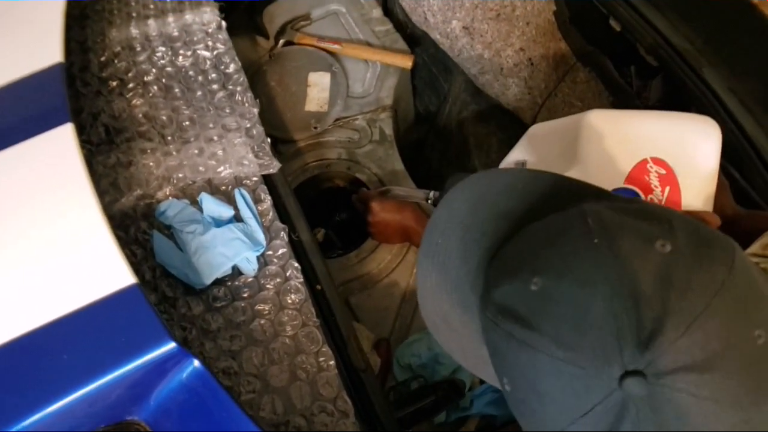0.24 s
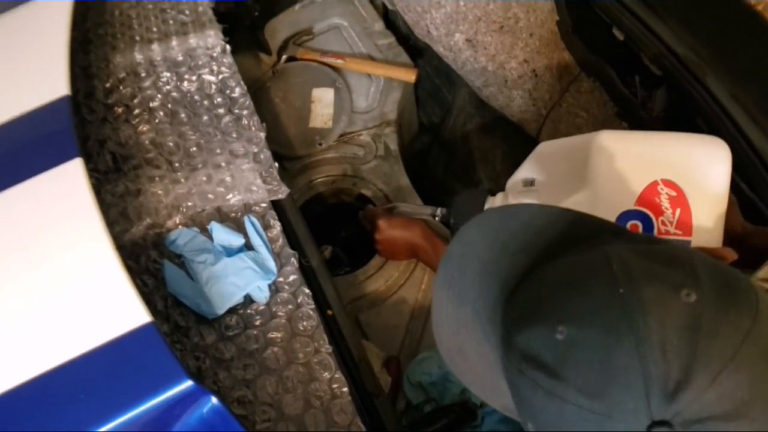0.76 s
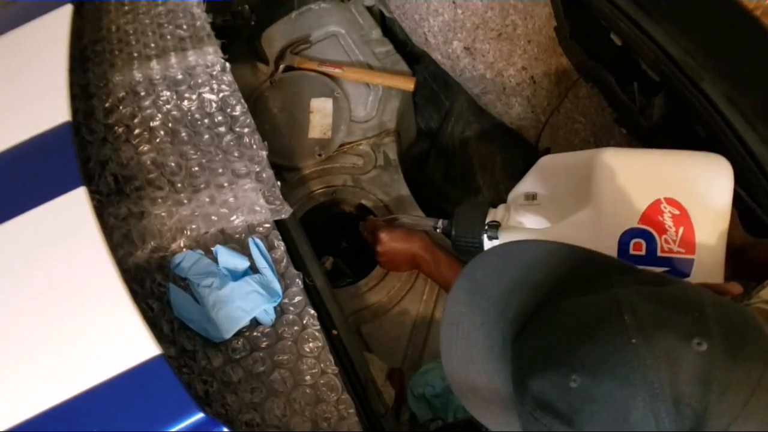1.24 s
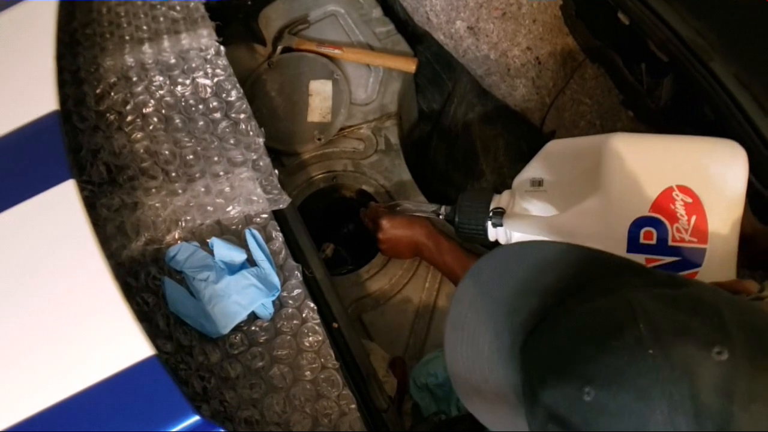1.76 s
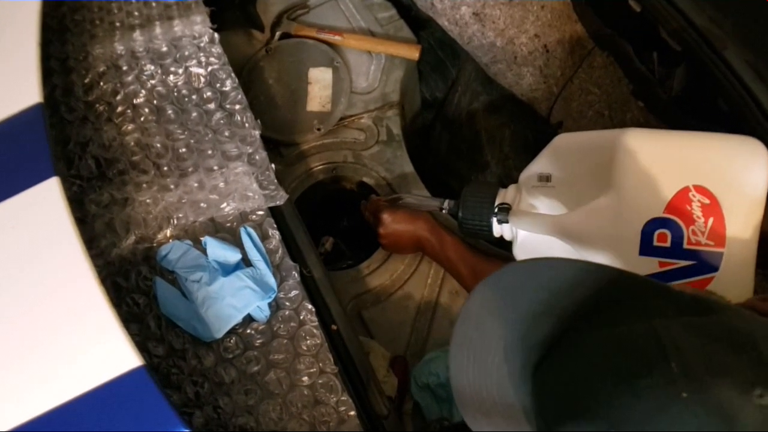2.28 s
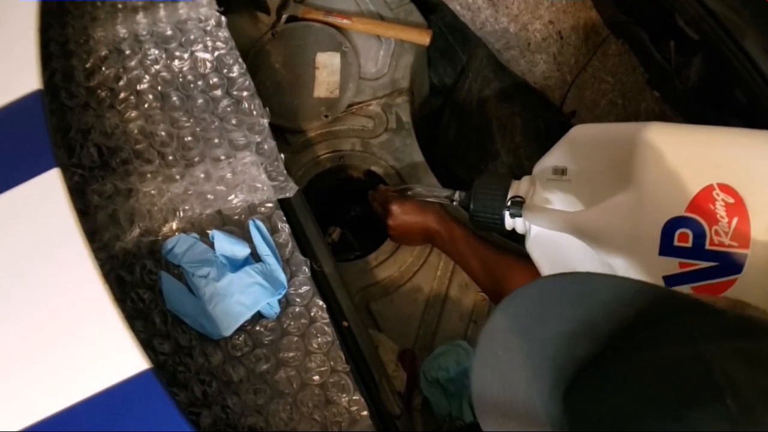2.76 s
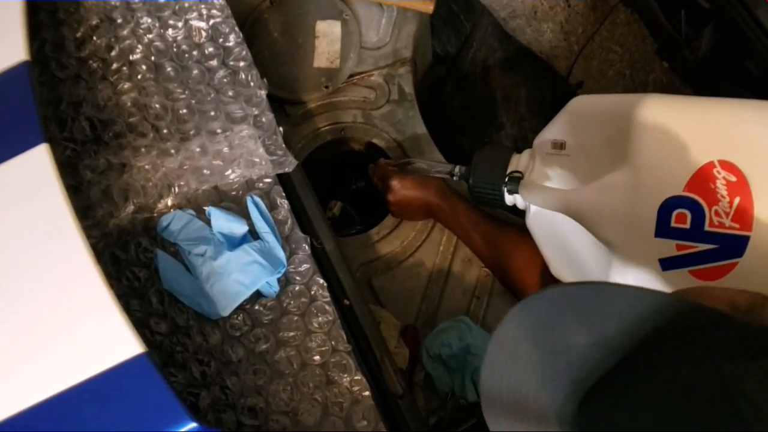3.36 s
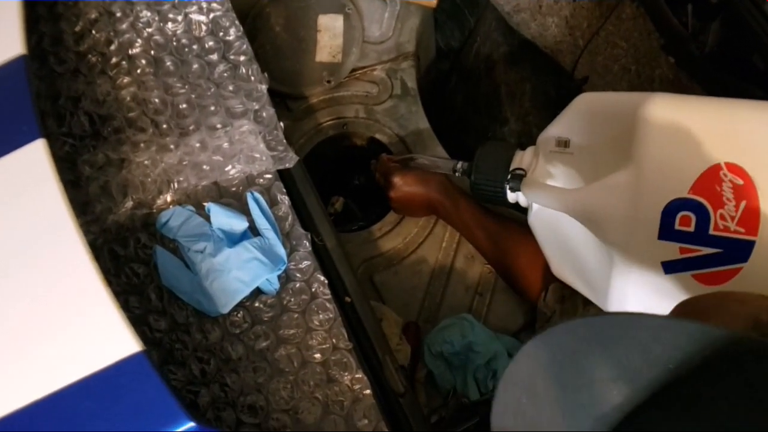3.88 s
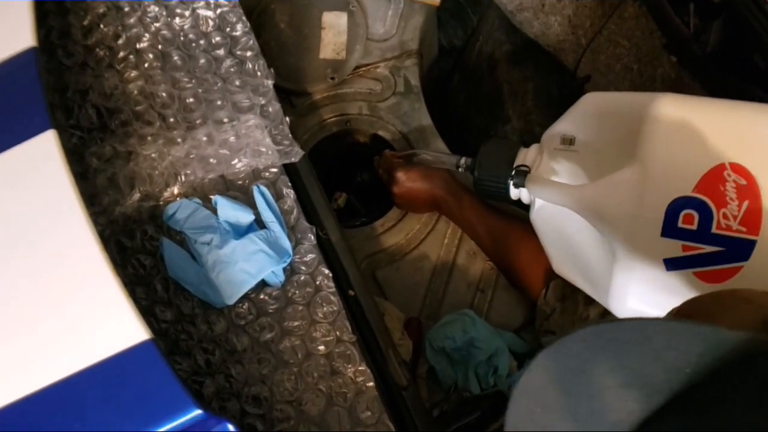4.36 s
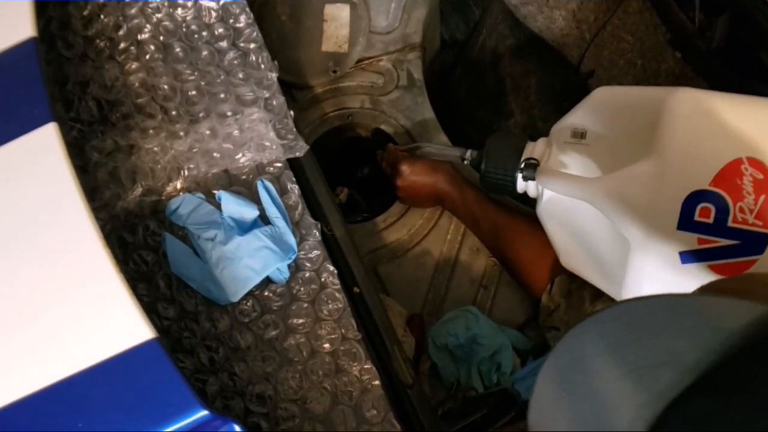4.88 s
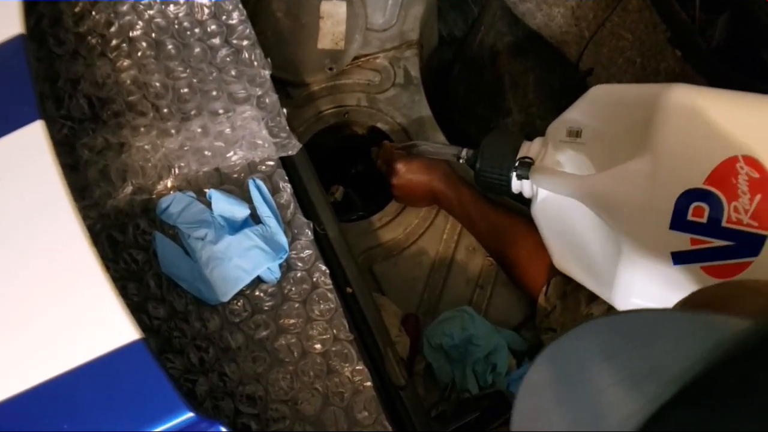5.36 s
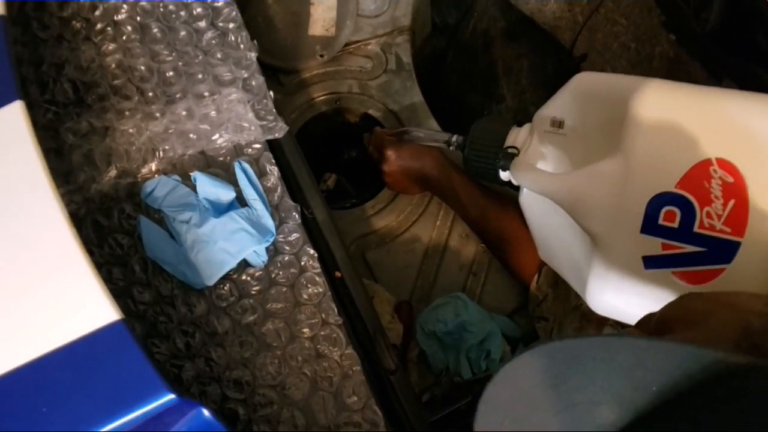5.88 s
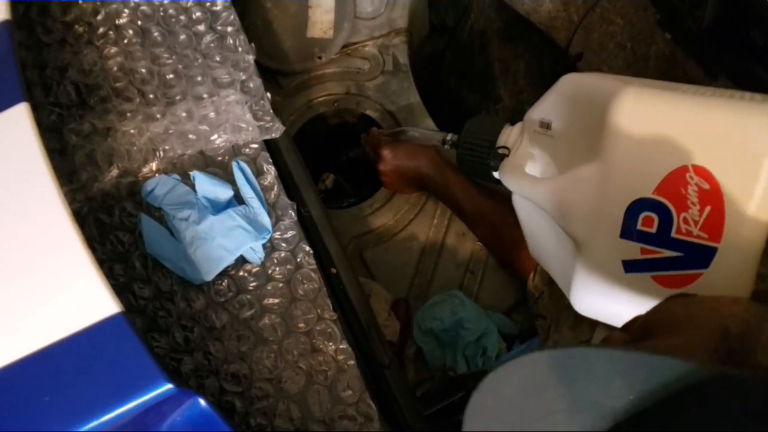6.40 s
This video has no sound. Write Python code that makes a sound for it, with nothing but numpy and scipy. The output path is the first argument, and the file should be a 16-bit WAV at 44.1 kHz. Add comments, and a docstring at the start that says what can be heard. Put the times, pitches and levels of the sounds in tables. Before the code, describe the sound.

Fuel runs continuously through a hose from a plastic jug into a hollow car tank, heard close and almost mono with slight garage reflections and a very faint steady noise. From 0 to 1 s a bright, fizzy spatter mixes with quick low plops, gurgling and soft jug rumble and bumps. At about 1.2 s the jug buckles with a deep, boomy thump, by far the loudest event, with a weaker one at 1.4 s. Small metallic hose knocks follow until 1.7 s. From 2 to 3.5 s the bubbling is calmer, the trickle dipping briefly near 1.9 and 2.8 s. Around 3.7 s the flow brightens with crisp splashes; a sharp slap comes at 4.6 s, then thicker gurgling and plops. Light hose knocks tick around 5.1 s, strong splashes snap at 5.9 s, and muffled jug thumps cluster from 6 s to the end at 6.6 s, still pouring.

```python
"""Fuel poured from a jug into a tank

Fuel runs through a hose into a car's hollow tank: filtered random clicks spatter and fizz, ringing in it.
Swarms of decaying, rising sines gurgle; single ones plop, and short noise bursts splash.
The jug rumbles (filtered noise) and thumps (decaying modes), once hard at 1.2 s.
Now and then the hose knocks on the ringing metal filler neck. Garage reflections add slight width,
over a faint steady noise, opposite in left and right.
"""
import sys
import numpy as np
from scipy import signal
from scipy.fft import rfft, irfft, next_fast_len
from scipy.io import wavfile
from scipy.ndimage import uniform_filter1d

SR = 44100
rng = np.random.default_rng(int(sys.argv[2]) if len(sys.argv) > 2 else 0)


def wav_record(signal):
    """Record a signal, one row per channel, as 16-bit PCM in the file named by sys.argv[1]."""
    frames = np.transpose(np.atleast_2d(signal))
    bounded = np.clip(frames, -1, 1)
    # unit amplitude maps onto the largest positive 16-bit level
    quanta = np.round(bounded * 32767).astype(np.int16)
    wavfile.write(sys.argv[1], SR, quanta)


N = 292824
T = np.arange(N) / SR
SHORT = T[:SR // 2]  # time axis of one event, s

# hose flow, with brief deep dips; FULL_FLOW_DB is a full hose: [t/s, level/dB]
FLOW_CURVE = [(0.0, -54), (0.15, -53.5), (0.22, -57.5), (1.18, -55), (1.92, -65), (1.96, -56.5),
              (2.59, -56), (2.83, -63.5), (2.92, -55.5), (3.73, -51.5), (4.42, -56.5), (4.44, -53),
              (4.88, -52.5), (4.97, -62), (5.01, -54), (5.36, -55), (6.64, -51)]
# brief level offsets of the spatter; below 0 dB quieter: [t/s, length/s, level/dB]
SPATTER_OFFSETS = [(0.15, 0.072, 4), (0.274, 0.089, 5), (0.546, 0.054, 4), (0.8, 0.042, 3.5),
                   (0.998, 0.32, 3), (1.449, 0.033, 7), (1.96, 0.083, 4), (2.21, 0.13, 4.5),
                   (2.548, 0.059, 2.5), (2.68, 0.048, -1.5), (2.806, 0.094, 2), (3.66, 0.11, 4.5),
                   (3.865, 0.14, 5), (4.093, 0.028, -0.5), (4.173, 0.12, 4.5), (4.34, 0.063, -2),
                   (4.422, 0.096, 6.5), (4.595, 0.086, 3.5), (4.82, 0.16, 1), (4.94, 0.026, 4.5),
                   (5.076, 0.3, 5.5), (5.375, .12, 4), (5.605, 0.12, 5), (5.92, 0.081, 6),
                   (6.038, 0.046, -4), (6.122, .016, -2), (6.149, 0.074, 5.5), (6.25, 0.026, 0)]
# spectra, relative: [f/Hz, level/dB]: big drops, fine spray, bursting foam
DROPS_SPECTRUM = [(800, -17), (1500, -16), (1850, -12), (2400, 1), (3100, 1), (3600, 1.5), (4400, -11),
                  (6000, -41)]
SPRAY_SPECTRUM = [(2000, -23), (3200, -22), (3900, 8), (4500, 9), (4850, 3), (5350, 4.5), (5900, -8),
                  (7000, -2.5), (10000, -53)]
FIZZ_SPECTRUM = [(3000, -9), (5500, 1), (6400, -5.5), (7200, 0), (7550, 3), (8500, -0.5), (9800, 0),
                 (11500, -5.5), (12900, -9), (13700, -83)]
# pool churning, before offsets: [t/s, large-bubble level/dB, small-bubble level/dB]
CHURN_CURVE = [(0.0, -61.5, -60), (0.74, -56, -63), (1.0, -57.5, -63.5), (1.74, -62.5, -63.5),
               (2.5, -61, -65), (2.74, -59.5, -61), (3.14, -61, -62.5), (3.62, -60, -64),
               (4.59, -55.5, -55), (4.96, -55, -57.5), (5.23, -54.5, -61), (5.73, -54.5, -58),
               (6.25, -57, -61), (6.64, -53, -58.5)]
# bubbling level offsets; below 0 dB quieter: [t/s, length/s, level/dB]
BUBBLING_OFFSETS = [(.41, 0.033, 3), (.53, 0.15, 3.5), (.77, 0.17, 1), (1.87, 0.022, 5), (2.49, .03, 0),
                    (2.55, 0.064, 2.5), (3.98, 0.072, 6), (4.18, 0.046, 3.5), (4.42, 0.054, -2),
                    (4.53, 0.145, -2.5), (4.72, 0.13, 2), (5.42, 0.12, 3), (6.05, 0.13, -2),
                    (6.25, 0.078, -1.5)]
# bubble swarm spectra, relative: [f/Hz, level/dB]
LARGE_BUBBLE_SPECTRUM = [(110, 2.5), (155, 9), (195, -10), (265, -2), (350, -5), (480, -7), (700, -6.5),
                         (1100, -13), (2000, -44)]
SMALL_BUBBLE_SPECTRUM = [(350, 13.5), (700, -5), (1050, 0.5), (1500, -1), (1750, -4.5), (2300, -1),
                         (4000, -24)]
# single big bubbles: [t/s, peak level/dB, f/Hz, decay/cycles per e-fold]
PLOP_EVENTS = [(0.026, -40.5, 332, 2.5), (.123, -47, 475, 2.8), (.246, -40.5, 1245, 5),
               (0.247, -40, 277, 1.7), (.352, -45, 400, 1.9), (.405, -47, 595, 3.4), (0.409, -39, 322, 3.9),
               (0.427, -35.5, 299, 3.7), (0.532, -43.5, 970, 1.8), (0.532, -43, 347, 2.2),
               (.557, -42, 279, 12), (.58, -45, 1430, 6), (0.647, -43.5, 335, 8.6), (0.761, -39, 274, 13),
               (0.884, -39.5, 306, 2.2), (.935, -45.5, 526, 3.2), (1.904, -47, 366, 5),
               (2.068, -44.5, 248, 7.5), (2.555, -41, 334, 2.9), (2.628, -39, 1530, 2.2),
               (3.83, -41, 358, 1.5), (4.352, -38, 280, 3.6), (4.419, -36, 1040, 1.1),
               (4.423, -39, 490, 1.7), (4.7, -41.5, 323, 5), (4.74, -35, 510, 1.8), (4.759, -32, 270, 2.6),
               (4.843, -40.5, 423, 3.8), (4.866, -38.5, 292, 4.5), (4.921, -41, 1160, 1.7),
               (4.999, -38, 2160, 5), (5.27, -44, 1243, 5.5), (5.407, -32.5, 1274, 4.9),
               (5.421, -41, 350, 2.5), (5.683, -41, 328, 3.3), (5.713, -39, 538, 4),
               (5.846, -35.5, 345, 3.1)]
# slugs of fuel on the pool: [t/s, peak level/dB, brightest f/Hz, width/Hz, e-fold decay/s]
SPLASH_EVENTS = [(0.578, -40, 3500, 2000, .005), (0.641, -36, 8800, 3500, .002),
                 (1.716, -43.5, 1580, 1600, 0.0046), (1.865, -44, 2200, 900, .006),
                 (2.306, -34.5, 3900, 1200, 0.0034), (2.549, -37.5, 3800, 1100, .005),
                 (2.568, -37.5, 3500, 900, 0.023), (3.455, -39, 4830, 1800, 0.0034),
                 (3.555, -38, 5000, 1200, 0.014), (3.664, -30, 4930, 1300, 0.0048),
                 (3.695, -45, 5100, 900, 0.023), (3.758, -38, 5030, 1200, 0.006),
                 (3.877, -41, 4300, 1500, .006), (3.822, -38.5, 2920, 1200, 0.0053),
                 (3.965, -37, 3720, 900, 0.0041), (4.068, -35, 8600, 3500, 0.0026),
                 (4.257, -33.5, 8200, 3500, 0.0015), (4.418, -45, 2650, 1500, 0.0063),
                 (4.447, -33.5, 7500, 2000, .003), (4.545, -36.5, 10600, 4000, .001),
                 (4.6233, -24.5, 4380, 1600, 0.0023), (4.624, -31, 7850, 3000, .002),
                 (4.73, -38, 550, 700, 0.026), (4.845, -39.5, 800, 1300, 0.023),
                 (5.1164, -34, 4200, 900, 0.011), (5.204, -32.5, 7800, 2020, 0.0016),
                 (5.91, -27.5, 5200, 1390, 0.0029), (5.913, -35.5, 5380, 1100, 0.046),
                 (5.94, -26.5, 4280, 2390, 0.0046), (6.291, -41, 3900, 900, 0.034),
                 (6.465, -40.5, 2800, 805, 0.023)]
# tank air resonances, nominal: [f/Hz, width/Hz, level/dB re direct sound]
TANK_MODES = [(510, 6.1, 4), (1502, 12, 2.5), (1610, 16, 3.5), (2500, 13, -13), (3200, 28, -3),
              (3610, 19, 10), (3880, 11, 15.5), (4466, 146, 10), (5310, 34, 13)]
# dense tank ring: [f/Hz, t60/s]
TANK_RING_T60 = [(200, 0.17), (1200, 0.21), (4500, 0.24), (7000, 0.16), (13000, 0.11)]
# jug flexing, before offset: [t/s, level/dB]
JUG_FLEX = [(0.0, -46.5), (0.39, -42), (1.07, -43), (1.29, -43.5), (2.48, -51.5), (3.75, -48.5),
            (3.85, -48), (4.68, -48.5), (4.86, -48), (5.16, -49), (6.14, -43.5), (6.2, -57), (6.27, -42.5),
            (6.64, -43)]
# jug rumble spectrum, relative: [f/Hz, level/dB]
RUMBLE_SPECTRUM = [(15, -1), (30, -4.5), (47, 2.5), (60, -2), (74, 1.5), (97, 2), (112, -5.5), (155, -20),
                   (190, -24.5), (400, -54.5)]
# jug thumps: [t/s, boom peak level/dB, f/Hz, t60/s, upper-mode hardness/dB]
THUMP_EVENTS = [(0.169, -33.5, 70.5, 0.69, -16), (0.221, -29, 60, 0.3, -24), (.345, -33, 88.7, 0.14, 1),
                (0.451, -31, 87, 0.04, 0), (0.617, -30.5, 78.1, 0.37, -4), (0.795, -36.5, 82.3, 0.57, 3),
                (1.229, -9, 74.8, 0.37, 0.5), (1.425, -25, 61.3, 0.31, -13), (1.694, -36.5, 64.7, 0.22, -2),
                (1.833, -32.5, 68.2, 0.35, -6), (2.077, -27, 70, 0.065, -13), (2.366, -25, 67, 0.1, -30),
                (3.68, -34.5, 70.8, 0.21, -9), (4.707, -30, 72, 0.55, -10), (4.858, -33.5, 78.3, 0.29, -10),
                (5.489, -30, 82, 0.11, -6), (5.755, -33.5, 91, 0.2, 1), (5.984, -28.5, 57, 0.39, -11),
                (6.066, -27.5, 70.8, 0.31, -8), (6.107, -36, 74, 0.2, -16), (6.24, -28, 72.2, 0.17, -4.5),
                (6.47, -26, 67.7, 0.49, -7), (6.542, -25.5, 70, 0.55, -2), (6.615, -23.5, 67.5, 0.22, -6)]
# jug wall modes: [f/main pitch, relative level/dB, t60/s]
WALL_MODES = [(.62, -9, 0.43), (1.2, -14, 0.23), (1.6, -16.5, 0.14), (2.2, -27.5, 0.27),
              (3.02, -17.5, 0.25), (3.45, -17, 0.08), (5.4, -22.5, 0.083), (8.65, -40, 0.4),
              (9.8, -33.5, 0.17), (11.85, -38, 0.18), (12.9, -28, 0.052), (19.5, -32, 0.25)]
# buckling plastic spectrum, relative: [f/Hz, level/dB]
CRACK_SPECTRUM = [(150, 0.5), (400, -3), (950, -5.5), (1500, -7.5), (2100, -12.5), (3600, -15), (6000, -35),
                  (12000, -74)]
# hose on neck: [t/s, peak level/dB, brightest f/Hz, ring re contact level/dB]
KNOCK_EVENTS = [(1.391, -34, 4170, -11), (1.472, -38, 7900, -13.5), (1.5904, -36.5, 4570, -11),
                (1.653, -37.5, 2780, -6), (1.654, -39.5, 1090, -5), (1.951, -38, 4100, -7),
                (2.812, -38, 4360, -11), (3.051, -37, 4400, -10), (5.068, -35, 4200, -6.5),
                (5.074, -39, 1020, 4), (5.133, -37, 1470, -3), (5.316, -38, 1200, -10),
                (6.531, -39, 1090, 16), (6.617, -47, 1080, 5)]
# metal filler neck modes: [f/Hz, relative level/dB, t60/s]
NECK_MODES = [(1040, 1.5, 0.15), (1160, -4.5, .1), (1234, -6.5, 0.21), (1457, 0.5, 0.26), (2690, -5, 0.053),
              (4156, 2, 0.18), (4570, 1.5, 0.23), (7840, -2, 0.19)]
# stereo side against mid: [f/Hz, level/dB]
WIDTH_SPECTRUM = [(70, -74), (140, -46), (250, -30), (500, -26.5), (2000, -20), (5000, -18.5), (8000, -17),
                  (12000, -13.5)]
# spectrum of the faint steady side noise, relative: [f/Hz, level/dB]
SIDE_NOISE_SPECTRUM = [(20, 13), (100, 9.5), (200, 7), (500, 2.5), (1200, -1.5), (2500, -25), (5000, 1),
                       (13000, -13)]

FULL_FLOW_DB, CALM_DB = -53, -61  # full hose; calm pool
SPATTER_DB, SPATTER_DB_PER_FLOW_DB = -54.5, 0.65  # level at full flow; slope
FIZZ_DB, FIZZ_DB_PER_OFFSET_DB = -52, 0.25  # level at full flow; slope
DROPS_DB, DROPS_DB_PER_CHURN_DB, DROPS_DB_PER_S = -3, 0.55, -0.05  # big drops re spray
OFFSET_ATTACK_S, OFFSET_RELEASE_S = 0.0078, 0.013
SLOSH_S, SLOSH_DETUNE = .06, .035  # time per surface shape; largest fractional shift of tank modes
JUG_LOW_HZ = 35.7  # jug too small to radiate well below
EDGE_HZ = 14200


def stream():
    """Big drops, fine spray and ticks of bursting foam follow the flow and its level offsets."""
    flow_db = curve(FLOW_CURVE) - FULL_FLOW_DB
    offset_db = offsets(SPATTER_OFFSETS)
    churn_db = curve(CHURN_CURVE, order=2) - CALM_DB
    drops_db = DROPS_DB + DROPS_DB_PER_CHURN_DB * churn_db + DROPS_DB_PER_S * T
    drops = gain_of(drops_db) * spatter(DROPS_SPECTRUM, per_s=500, spread_db=3.5, echo_db=7.5, patchy_db=2.5)
    spray = spatter(SPRAY_SPECTRUM, per_s=700, spread_db=4.0, echo_db=9, patchy_db=2.5)
    fizz = spatter(FIZZ_SPECTRUM, per_s=1500, spread_db=4.0, echo_db=5.0, patchy_db=1.5)
    fizz = fizz * unsteady(depth_db=0.35, slow_hz=2.9, fast_hz=11)
    spatter_gain = gain_of(SPATTER_DB + SPATTER_DB_PER_FLOW_DB * flow_db + offset_db)
    fizz_gain = gain_of(FIZZ_DB + flow_db + FIZZ_DB_PER_OFFSET_DB * offset_db)
    return spatter_gain * (drops + spray) + fizz_gain * fizz


def spatter(spectrum, per_s, spread_db, echo_db, patchy_db):
    """Droplets of the broken stream strike the pool and ring in the tank."""
    ringing = sloshed(impacts(per_s, spread_db), echo_db)
    return evened(wander(colour(ringing, spectrum), patchy_db))


def wander(x, patchy_db, patch_hz=900, patch_s=0.052):
    """The stream's point of impact wanders: smoothed random gains shift its colour."""
    hz, t, z = signal.stft(x, SR, nperseg=512)
    patches = rng.standard_normal(z.shape)
    patches = uniform_filter1d(patches, round(patch_hz / hz[1]) + 1, axis=0)
    patches = uniform_filter1d(patches, round(patch_s / t[1]) + 1, axis=1)
    return signal.istft(z * gain_of(patchy_db * evened(patches)), SR, nperseg=512)[1][:N]


def churn(large_db=2, small_db=3.0, small_per_bubbling=1.0, small_per_spatter=0.13):
    """Air dragged under by the stream comes up in large and small bubbles."""
    bubbling_db = offsets(BUBBLING_OFFSETS)
    large = gurgle(LARGE_BUBBLE_SPECTRUM, low_hz=160.0, high_hz=781, per_s=170, cycles=1.42,
                   spread_db=2.5, wash_db=-6.5)
    small = gurgle(SMALL_BUBBLE_SPECTRUM, low_hz=739, high_hz=2264, per_s=380, cycles=1.87,
                   spread_db=3.0, wash_db=-4.5)
    small_offset_db = small_per_bubbling * bubbling_db + small_per_spatter * offsets(SPATTER_OFFSETS)
    large_gain = gain_of(large_db + curve(CHURN_CURVE, order=1) + bubbling_db)
    small_gain = gain_of(small_db + curve(CHURN_CURVE, order=2) + small_offset_db)
    return large_gain * large + small_gain * small


def gurgle(spectrum, low_hz, high_hz, per_s, cycles, spread_db, wash_db, count=16):
    """A swarm of bubbles of many sizes over the soft wash of moving fuel."""
    births = impacts(per_s, spread_db)
    size_class = rng.integers(0, count, N)
    swarm = np.zeros(N)
    for k, hz in enumerate(np.geomspace(low_hz, high_hz, count)):
        one = np.sqrt(hz) * bubble(hz, cycles)[:4096]
        swarm += signal.oaconvolve(births * (size_class == k), one)[:N]
    wash = evened(colour(rng.standard_normal(N), spectrum))
    swarm = evened(colour(swarm, spectrum)) + gain_of(wash_db) * wash
    return evened(sloshed(swarm, echo_db=3.5))


def bubble(hz, cycles, rise=0.071):
    """A bubble rings briefly, its pitch rising as it nears the surface."""
    age = SHORT * hz / cycles  # in decay times
    turns = np.cumsum(hz * (1 + rise * (np.minimum(age, 2) - .5))) / SR
    return np.sin(2 * np.pi * turns) * np.exp(-age) * (1 - np.exp(-SHORT * hz * 2))


def plops(rise=0.035, froth_db=-7, froth_s=0.012, froth_width=1.2):
    """Single big bubbles burst in a puff of froth and set the tank ringing."""
    out = np.zeros(N)
    for s, db, hz, cycles in PLOP_EVENTS:
        froth = band_burst(hz, froth_width * hz, froth_s)
        burst = bubble(hz, cycles, rise) + peaked(froth, froth_db)
        add(out, s, peaked(through(burst, tank(echo_db=-4)), db))
    return out


def splashes():
    """A slug of fuel slaps the pool: a short burst of spray, then the ring of the tank."""
    out = np.zeros(N)
    for s, db, hz, width_hz, burst_s in SPLASH_EVENTS:
        slap = band_burst(hz, width_hz, burst_s)
        add(out, s, peaked(through(slap, tank(echo_db=-12.0)), db))
    return out


def band_burst(hz, width_hz, decay_s):
    """Decaying noise through two equal resonances."""
    burst = rng.standard_normal(len(SHORT)) * np.exp(-SHORT / decay_s)
    return resonate(resonate(burst, hz, width_hz), hz, width_hz)


def tank(echo_db, stretch=1, waves_db=0):
    """Response of the tank: direct sound, standing waves and a dense ring between the walls."""
    click = 1. * (SHORT == 0)
    hz, t, z = signal.stft(rng.standard_normal(len(SHORT)), SR, nperseg=256)
    decay = gain_of(-60 * t / read(TANK_RING_T60, hz)[:, None])
    ring = signal.istft(z * decay, SR, nperseg=256)[1][:len(SHORT)]
    waves = sum(gain_of(db) * resonate(click, f * stretch, width) for f, width, db in TANK_MODES)
    return click + gain_of(waves_db) * waves + gain_of(echo_db) * ring / np.linalg.norm(ring)


def sloshed(x, echo_db, count=10):
    """The moving surface keeps changing the tank's ring and shifts its standing waves."""
    stretches = 1 + SLOSH_DETUNE * np.linspace(-1, 1, count)
    shapes = [tank(echo_db, stretch)[:SR // 4] for stretch in stretches]
    out, hop = np.zeros(N), round(SLOSH_S * SR)
    for centre in range(0, N + hop, hop):
        at = np.arange(max(centre - hop, 0), min(centre + hop, N))
        faded = x[at] * np.cos(np.pi / 2 * (at - centre) / hop)
        add(out, at[0] / SR, signal.fftconvolve(faded, shapes[rng.integers(count)]))
    return out


def jug(swell_s=0.009, stiffen=0.085, relax_s=0.052, crack_db=-17, crack_t60_s=0.27, rumble_db=4.5):
    """The wall rumbles as it flexes and thumps when it buckles, starting sharp while taut."""
    out = gain_of(rumble_db + curve(JUG_FLEX)) * evened(colour(rng.standard_normal(N), RUMBLE_SPECTRUM))
    hollow = tank(echo_db=-11.0, waves_db=-13)
    for s, db, hz, t60_s, hard_db in THUMP_EVENTS:
        turns = hz * np.cumsum(1 + stiffen * np.exp(-SHORT / relax_s)) / SR
        swell = 1 - np.exp(-(SHORT / swell_s) ** 2)
        boom = -np.sin(2 * np.pi * turns) * gain_of(-60 * SHORT / t60_s) * swell
        ring = np.zeros(len(SHORT))
        for k, (ratio, mode_db, fade_s) in enumerate(WALL_MODES):
            mode = np.sin(2 * np.pi * hz * ratio * SHORT)
            ring += gain_of(mode_db - 60 * SHORT / fade_s) * mode * (-1) ** k
        ring *= 1 - np.exp(-SHORT / 0.0017)
        crack = colour(rng.standard_normal(len(SHORT)), CRACK_SPECTRUM) * gain_of(-60 * SHORT / crack_t60_s)
        add(out, s, peaked(boom, db) + gain_of(db + hard_db) * ring)
        # crease snaps before the wall swings
        add(out, s - .004, peaked(through(crack, hollow), db + hard_db + crack_db))
    return colour(out, [(JUG_LOW_HZ / 2, -14), (JUG_LOW_HZ, -6), (JUG_LOW_HZ * 1.3, 0)])


def knocks(contact_s=0.0023, scuff_db=-11, contact_width=0.35, reach_hz=330, swell_s=0.00066):
    """The hose strikes and scuffs the neck; where it lands decides which modes ring on."""
    out = np.zeros(N)
    for s, db, hz, ring_db in KNOCK_EVENTS:
        scuff = rng.standard_normal(len(SHORT)) * np.exp(-SHORT / contact_s)
        blow = (SHORT == 0) + gain_of(scuff_db) * scuff / 2
        contact = resonate(resonate(blow, hz, contact_width * hz), hz, contact_width * hz)
        contact = through(contact, tank(echo_db=-4, waves_db=-4))
        ring = np.zeros(len(SHORT))
        for f, mode_db, t60_s in NECK_MODES:
            nearness = 1 / (1 + ((f - hz) / reach_hz) ** 2)
            ring += gain_of(mode_db - 60 * SHORT / t60_s) * np.sin(2 * np.pi * f * SHORT) * nearness
        ring *= 1 - np.exp(-SHORT / swell_s)
        add(out, s, peaked(peaked(contact, 0) + peaked(ring, ring_db), db))
    return out


def garage(mid, scatter_s=0.059):
    """Side signal of the garage: reflections that smear time but keep colour, then set by WIDTH_SPECTRUM."""
    walls = rfft(rng.standard_normal(len(SHORT)) * np.exp(-SHORT / scatter_s))
    scatter = irfft(walls / abs(walls))
    return colour(through(mid, scatter), WIDTH_SPECTRUM)


def side_noise(level_db=-72):
    """Faint steady noise, opposite in left and right."""
    return gain_of(level_db) * evened(colour(rng.standard_normal(N), SIDE_NOISE_SPECTRUM))


def impacts(per_s, spread_db):
    """Random clicks of either sign, mostly small, a few large."""
    size = gain_of(spread_db * np.minimum(rng.exponential(1, N), 9 / 2))
    return size * rng.choice([-1, 1], N) * (rng.random(N) < per_s / SR)


def curve(rows, order=1):
    """One column of a curve at every sample."""
    rows = np.array(rows)
    return np.interp(T, rows[:, 0], rows[:, order])


def offsets(rows):
    """Sum of brief dB offsets: each ramps in quickly, holds and ramps out."""
    total_db = np.zeros(N)
    for s, length_s, db in rows:
        attack = (T - s) / OFFSET_ATTACK_S + .5
        release = 1 - (T - s - length_s) / OFFSET_RELEASE_S
        total_db += db * np.clip(np.minimum(attack, release), 0, 1)
    return total_db


def unsteady(depth_db, slow_hz, fast_hz, count=24):
    """A gain that wavers at random."""
    t = T[::100]
    sway = sum(np.sin(2 * np.pi * (hz * t + rng.random())) / np.sqrt(hz)
               for hz in np.geomspace(slow_hz, fast_hz, count))
    return gain_of(depth_db * np.interp(T, t, evened(sway)))


def gain_of(db):
    """Decibels to a factor."""
    return 10 ** (np.asarray(db) / 20)


def evened(x):
    """Scales to rms 1."""
    return x / np.sqrt(np.mean(x ** 2) + 1e-20)


def peaked(x, db):
    """Scales to a peak level."""
    return gain_of(db) * x / abs(x).max()


def read(points, hz):
    """Reads a spectrum on a log-frequency axis."""
    f, value = np.transpose(points)
    return np.interp(np.log(hz + 1), np.log(f), value)


def colour(x, points):
    """Filters by a spectrum."""
    size = next_fast_len(len(x) + 4096)
    gain = gain_of(read(points, np.fft.rfftfreq(size, 1 / SR)))
    return irfft(rfft(x, size) * gain, size)[:len(x)]


def resonate(x, hz, width_hz):
    """A one-pole complex resonance, gain about 1 at its peak."""
    r = np.exp(-np.pi * width_hz / SR)
    return 2 * signal.lfilter([1 - r], [1, -r * np.exp(2j * np.pi * hz / SR)], x).real


def through(x, response):
    """Passes a sound through an impulse response."""
    return signal.fftconvolve(x, response)[:len(x)]


def add(mix, s, sound):
    """Mixes a sound in at a time."""
    part = mix[max(round(s * SR), 0):][:len(sound)]
    part += sound[:len(part)]


def scene():
    """All sources share one spot; the side signal adds slight width."""
    mid = stream() + churn() + plops() + splashes() + jug() + knocks()
    side = garage(mid) + side_noise()
    return np.array([mid + side, mid - side])


def record(dry):
    """Low-pass at the band edge."""
    low_pass = signal.firwin(511, EDGE_HZ, window=("kaiser", 9), fs=SR)
    return signal.oaconvolve(dry, low_pass[None], "same")


dry = scene()
out = record(dry)
wav_record(out)
```